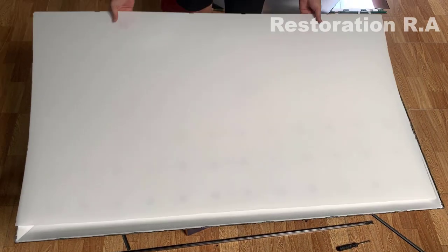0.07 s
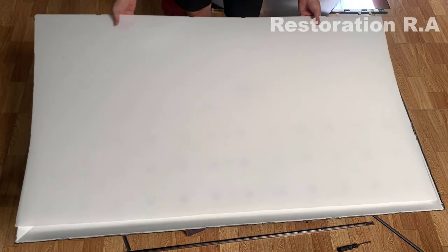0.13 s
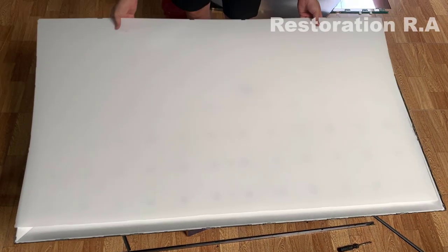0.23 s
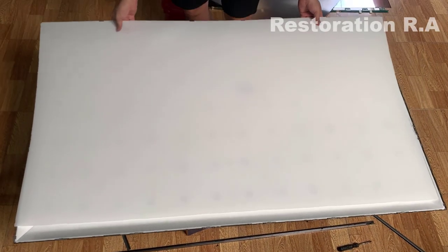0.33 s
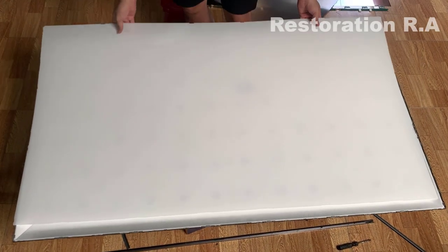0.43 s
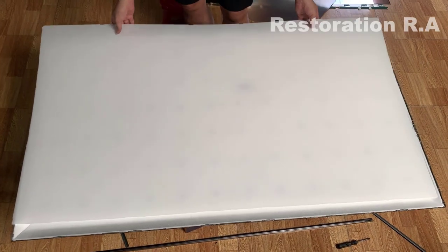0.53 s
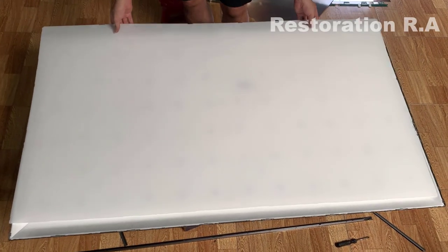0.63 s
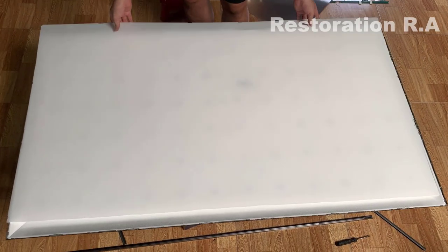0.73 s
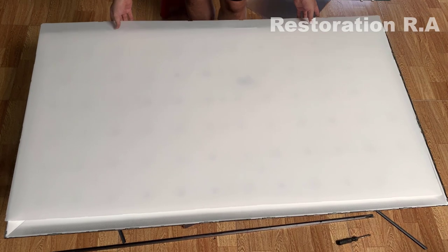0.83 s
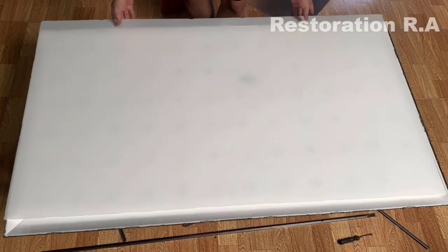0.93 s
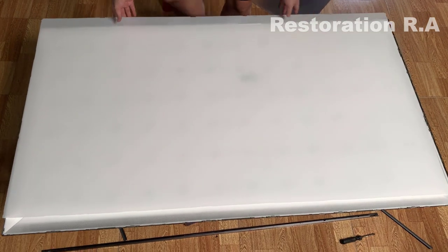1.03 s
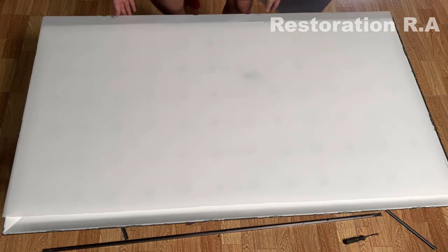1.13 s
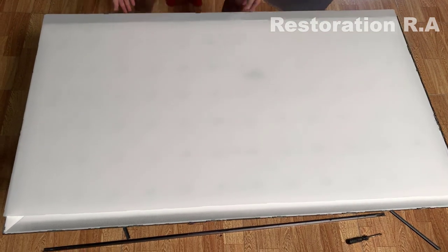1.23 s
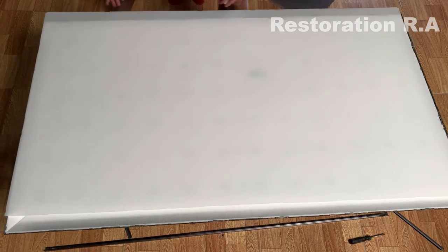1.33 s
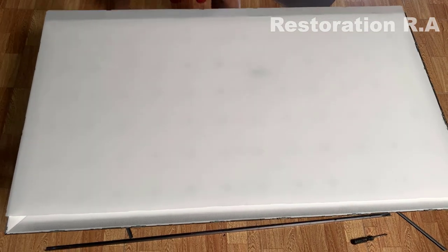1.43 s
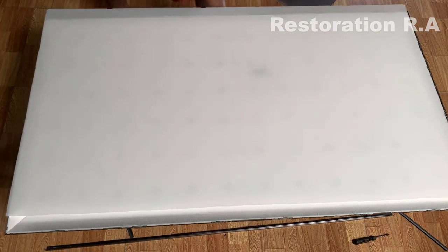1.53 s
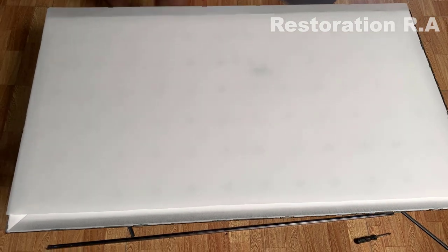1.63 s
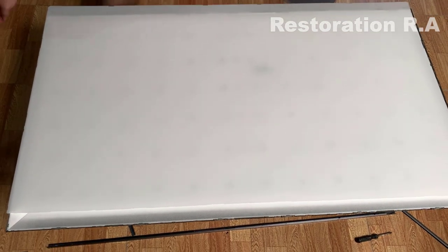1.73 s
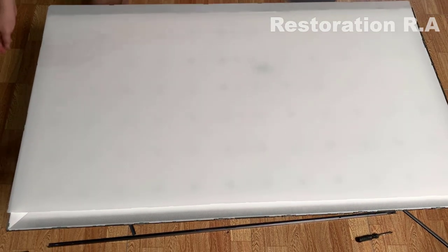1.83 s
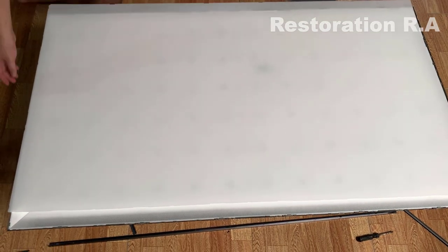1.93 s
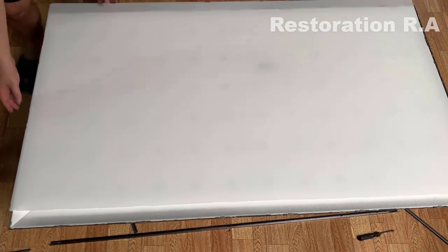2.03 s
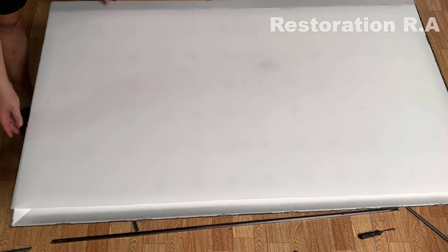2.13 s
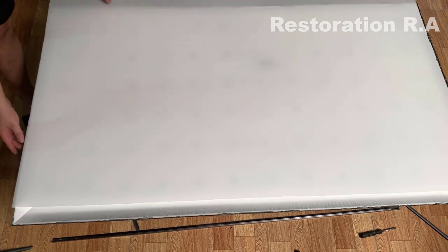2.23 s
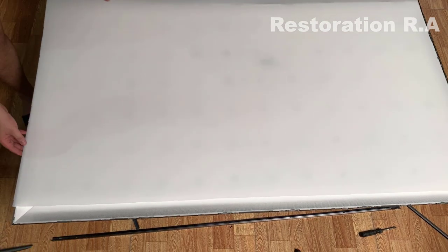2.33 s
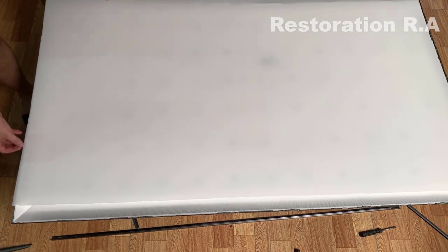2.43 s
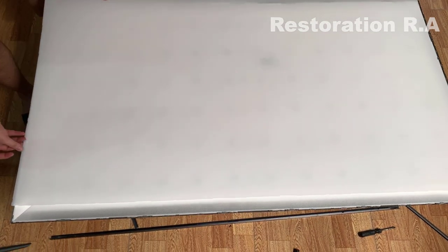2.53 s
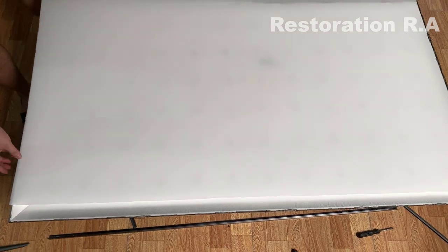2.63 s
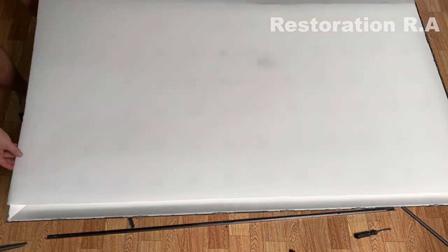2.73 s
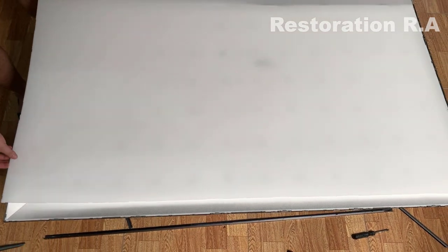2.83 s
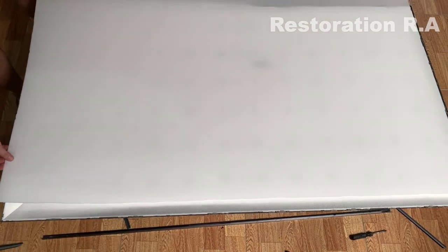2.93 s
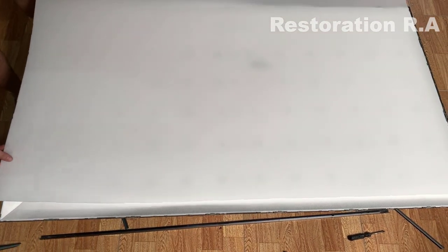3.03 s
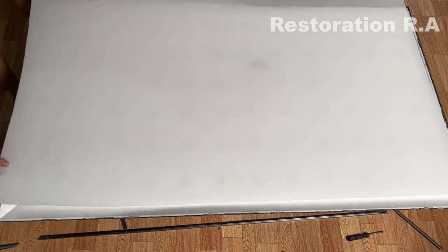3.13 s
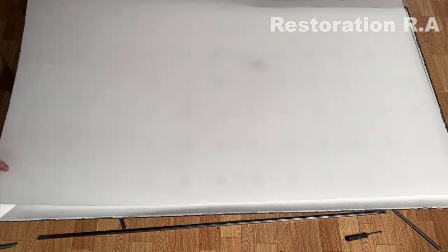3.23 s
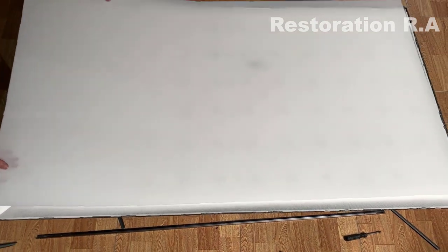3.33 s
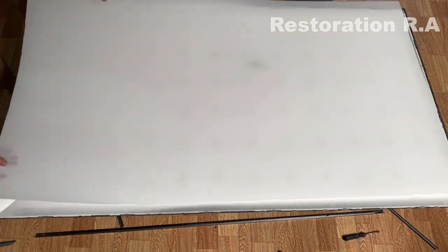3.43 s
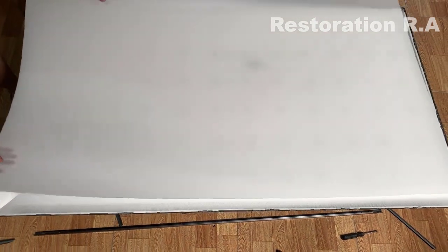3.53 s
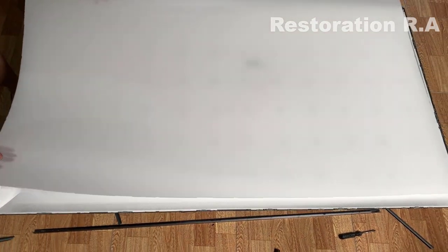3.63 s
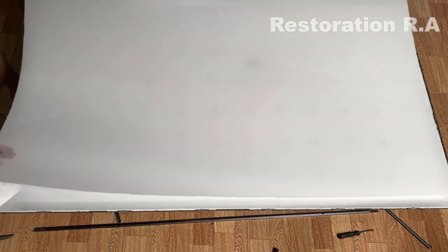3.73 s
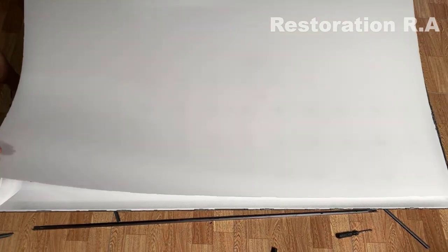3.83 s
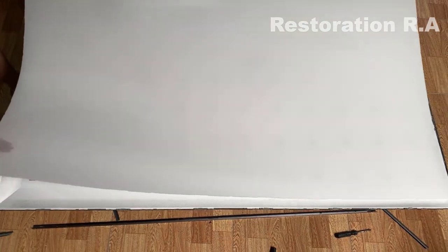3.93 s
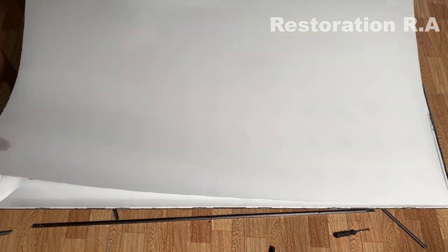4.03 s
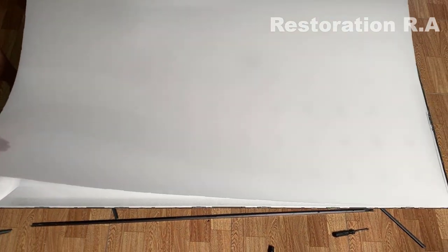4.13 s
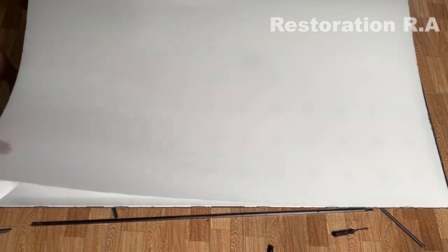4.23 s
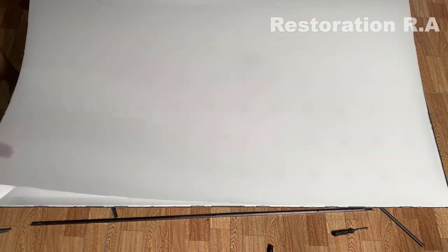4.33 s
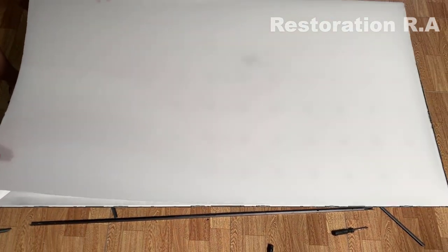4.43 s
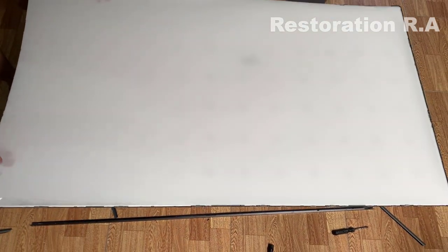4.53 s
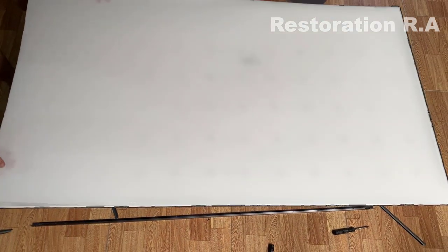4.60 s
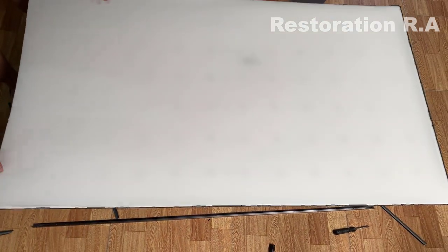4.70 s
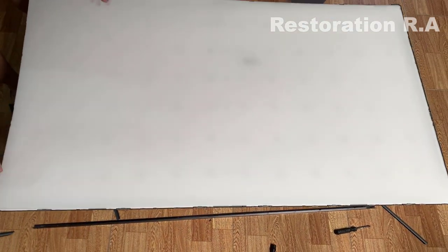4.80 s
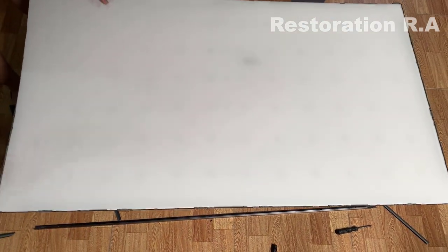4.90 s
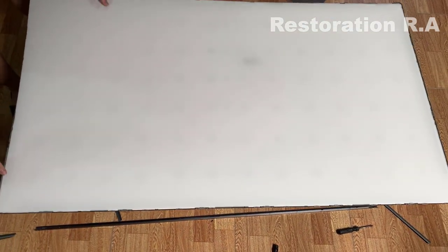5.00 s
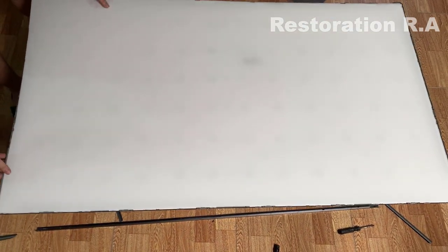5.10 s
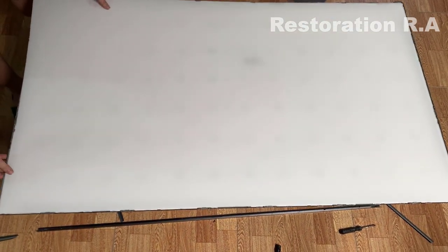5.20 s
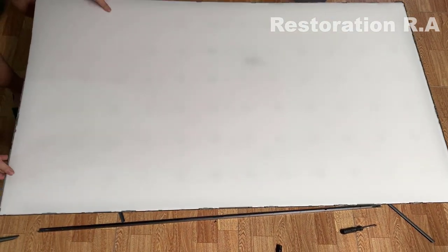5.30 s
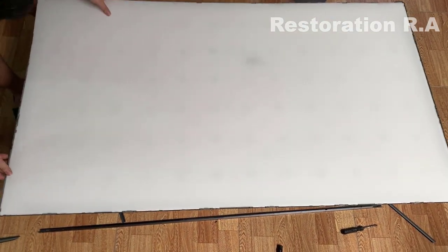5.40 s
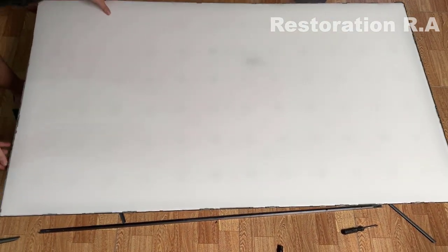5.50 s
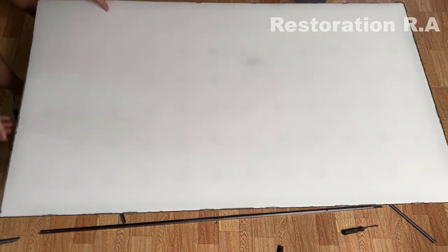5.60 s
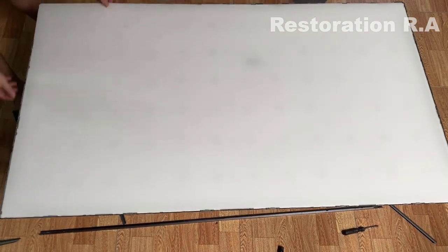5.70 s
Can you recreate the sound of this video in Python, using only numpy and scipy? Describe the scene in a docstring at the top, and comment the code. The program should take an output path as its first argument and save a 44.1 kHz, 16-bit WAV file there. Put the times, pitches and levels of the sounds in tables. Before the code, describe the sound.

A large, thin, stiff plastic sheet is moved by hand in a small room with short reflections, over a quiet low hum, faint hiss and a barely audible thin steady tone. From 0 to 0.45 s it is already moving: a rattling front, hollow mid-low knocks, gritty crackle and short high squeals of its edge. Softer bends follow, with a distinct hollow knock at about 0.9 s and a smaller one at 1.1 s. From 1.2 to 2.2 s it is nearly still, with only faint soft shuffling steps. Light knocks and a brief squeak come at 2.4 to 2.7 s. From 2.95 to 4.3 s the loudest passage erupts: dense sharp snaps, crackling, squealing and grating rubs, and low wobbling flaps, strongest around 4.0 to 4.2 s with a deep air puff. A separate knock lands at 4.55 s, a dull bend at 4.9 s, then only faint bends and small ticks to the end near 5.8 s.

```python
"""Low hollow knocks, crackle and squealing scrapes burst from a large thin plastic sheet, with pauses between.
It is lifted, bent and slid over its tray on a workshop floor: bends ring its dense low modes through fine slips,
its edge squeals and grates, flaps move filtered air noise, and creases snap as sharp ringing bursts.
Soft steps are filtered noise; a small room answers sheet and steps over a quiet hum with a thin steady tone."""
import sys
import numpy as np
from scipy import signal
from scipy.fft import rfft, irfft, next_fast_len
from scipy.io import wavfile
from scipy.ndimage import uniform_filter1d

SR = 44100
rng = np.random.default_rng(int(sys.argv[2]) if len(sys.argv) > 2 else 0)


def wav_record(signal):
    """Record a signal, one row per channel, as 16-bit PCM in the file named by sys.argv[1]."""
    frames = np.transpose(np.atleast_2d(signal))
    bounded = np.clip(frames, -1, 1)
    # unit amplitude maps onto the largest positive 16-bit level
    quanta = np.round(bounded * 32767).astype(np.int16)
    wavfile.write(sys.argv[1], SR, quanta)


N = 253871  # length in samples

# Resonances of the bending sheet, its stiff crackle and its rattling edge.
# Each row: frequency in Hz, width in Hz, relative level in dB.
BEND_MODES = [(417.3, 102, -17.5), (459.2, 57, 8.5), (482.6, 14, 19.5), (588.46, 94, 15), (684, 12, 3),
              (670, 4.9, 19), (785, 121, 11.5), (875, 8, 16.5), (888, 52, 11), (1006, 12, 2.5)]
CRACKLE_MODES = [(1120, 130, -2), (1238.5, 7.3, 3), (1270, 130, 0.5), (1570, 400, -5)]
RATTLE_MODES = [(1750, 430, 7.5), (2135, 530, 6.5), (2400, 280, 7.5), (4300, 2000, -12)]
# The edge rubs along the tray. Each row: start in seconds, rise in seconds, hold in seconds, squeal level in dB,
# then sheen and grit in dB against that level.
RUBS = [(0.0, 0.00081, 0.047, -38, -6, 9.5), (0.06, 0.026, 0.12, -38.5, -3, -6.5),
        (0.2, 0.013, 0.029, -31.5, -27, -37), (0.301, 0.0016, 0.01, -37.5, -31, -14),
        (0.35, 0.046, 0.023, -65.5, 10.5, 0), (0.899, 0.014, 0.13, -82, 5, 5),
        (2.385, .015, 0.015, -88, -14, 19), (2.432, 0.0038, 0.026, -57, -23, -21),
        (2.569, 0.032, 0.031, -41, -3, -13.5), (2.695, 0.022, 0.053, -69, 0, -15),
        (2.86, 0.04, 0.057, -65.5, 0, 9), (2.95, 0.0014, 0.076, -39.5, 1, -8),
        (2.998, 0.016, 0.0092, -27, -13.5, -8.5), (3.138, 0.009, 0.11, -33.5, -1, 5),
        (3.345, 0.0036, 0.067, -41, 2, 1), (3.398, 0.0087, 0.044, -39, -2.5, -5),
        (3.536, 0.004, 0.082, -35, -2.5, -2.5), (3.612, 0.031, 0.023, -30, 0, 0),
        (3.792, 0.0048, 0.034, -41.5, -5, -7.5), (3.871, 0.0034, 0.14, -40.5, -4, 2.5),
        (3.952, 0.022, 0.051, -34.5, 2.5, 4), (4.018, 0.032, 0.053, -29, 3, 6),
        (4.12, 0.031, 0.15, -31.5, -2, 2), (4.285, 0.024, 0.077, -39.5, 5.5, 9.5),
        (4.402, 0.012, 0.042, -42.5, 0.5, -5), (4.548, 0.0037, 0.017, -61.5, 10.5, 8.5),
        (4.64, 0.014, 0.012, -73.5, 14.5, 10), (4.918, 0.05, 0.021, -67.5, -14, 8),
        (5.317, 0.0027, 0.014, -64.5, 7, 6), (5.46, 0.012, 0.036, -77.5, -0.5, 13),
        (5.59, 0.04, 0.012, -51, -7, -19), (5.635, 0.0022, 0.0043, -48.5, -3.5, -23)]
WAVER_DB, WAVER_S = 3.5, .03  # random swell of each mode as the sheet changes shape, and its time step
DRIFT, DRIFT_S = .03, .06  # rough share by which bending shifts pitch, and seconds between shapes


def undb(db):
    """Turn dB into an amplitude factor."""
    return 10 ** (np.asarray(db) / 20)


def unit(x):
    """Scale to an RMS of one."""
    return x / np.sqrt(np.mean(x ** 2))


def decay(t60, count):
    """Exponential fade that loses 60 dB in t60 seconds."""
    return np.exp(-np.log(1000) * np.arange(count) / (SR * t60))


def pair(count):
    """Left and right noises whose likeness and phase offset depend on frequency."""
    # Stereo width. Each row: frequency in Hz, left-right coherence from 0 to 1,
    # phase lead of the left in radians (negative: the right leads).
    likeness = [(59.9, .9, 0), (487.6, 0.87, 0), (930, 0.65, 0), (2220, .4, -1.5), (4000, 0.6, -1.62),
                (7300, 0.9, -1.5), (10800, 0.1, -3), (15000, 1, -5)]
    hz, share, lead = np.transpose(likeness)
    pitch = np.log(np.fft.rfftfreq(count, 1 / SR) + 1)
    coherence = np.clip(np.interp(pitch, np.log(hz), share), 0, 1)
    lead = np.interp(pitch, np.log(hz), lead)
    left, other = rfft(rng.standard_normal((2, count)))
    right = coherence * left + np.sqrt(1 - coherence ** 2) * other
    return irfft([left, right * np.exp(-1j * lead)], count)


def ring(x, modes, waver_db=0):
    """Resonances with neighbours in opposite sign; little is radiated outside the family."""
    bottom = modes[0][0] - 2 * modes[0][1]
    top = min(modes[-1][0] + 2 * modes[-1][1], .45 * SR)
    band = signal.butter(2, np.maximum([bottom, top], 20), "band", fs=SR, output="sos")
    x = signal.sosfilt(band, x)
    out, t = 0, np.arange(x.shape[1]) / SR
    for k, (hz, width, db) in enumerate(modes):
        if waver_db:
            knots = np.arange(0, t[-1] + WAVER_S, WAVER_S)
            db = db + waver_db * np.interp(t, knots, rng.standard_normal(len(knots)))
        mode = signal.lfilter(*signal.iirpeak(hz, hz / width, SR), x)
        out = out + (-1) ** k * undb(db) * mode
    return out


def split(modes, hz):
    """The modes below a frequency, then those from it upwards."""
    return [m for m in modes if m[0] < hz], [m for m in modes if m[0] >= hz]


def slips(rate, scatter_db, t60, click_db):
    """Random slips per second of uneven size: a click, then a short rustle as the bend spreads."""
    size_db = scatter_db * np.minimum(rng.exponential(size=N), 3)
    hit = (rng.random(N) < rate / SR) * undb(size_db)
    # rustles add as powers
    rustle = np.sqrt(signal.fftconvolve(hit ** 2, decay(t60, 3300) ** 2)[:N] + 1e-12)
    return (rustle + undb(click_db) * hit) * pair(next_fast_len(N))[:, :N]


def swells(rows, levels_db, fall):
    """Each row climbs to its level, holds, then dies away at fall dB per s; rows add as powers."""
    rise_db = 25  # climbed during the rise
    t, power = np.arange(0, N + 64, 32) / SR, 1e-14
    for (start, rise, hold, *_), db in zip(rows, levels_db):
        top = start + max(rise, .001)
        climb_left_db = rise_db * np.maximum(top - t, 0) / (top - start)
        fallen_db = fall * np.maximum(t - top - hold, 0)
        power = power + undb(db - climb_left_db - fallen_db) ** 2
    return np.interp(np.arange(N) / SR, t, np.sqrt(power))


def balance(rows):
    """Gain that follows a table of time in seconds and level in dB."""
    return undb(np.interp(np.arange(N) / SR, *np.transpose(rows)))


def drift(x, share):
    """The modes slide up and down together as the curvature changes, by a wandering delay."""
    at, knots = np.arange(N), np.arange(0, N + DRIFT_S * SR, DRIFT_S * SR)
    lag = share * DRIFT_S * SR * rng.standard_normal(len(knots))
    lag = uniform_filter1d(np.interp(at, knots, lag), int(DRIFT_S * SR / 2))
    return np.array([np.interp(at + lag, at, side) for side in x])


def bending(scrape):
    """Fine slips in the flexing plastic drive low modes, crackle and edge rattle; rubbing adds to the rattle."""
    # The sheet is bent. Each row: start in seconds, rise in seconds, hold in seconds, level in dB,
    # stiff crackle in dB against that level.
    bends = [(0.0, 0.00056, 0.045, -31.5, -4.5), (0.067, 0.044, 0.061, -30.5, -7.5),
             (0.291, 0.0016, 0.018, -53, 8), (0.36, 0.042, 0.019, -37, -16),
             (0.558, 0.04, 0.066, -47, -21.5), (0.634, 0.069, 0.082, -42.5, -21),
             (0.885, 0.039, 0.017, -31, -11), (0.954, 0.025, 0.08, -40.5, -15.5),
             (1.1, 0.029, 0.027, -42.5, -13), (2.174, 0.037, .03, -52, -20),
             (2.303, 0.016, 0.032, -57.5, -28.5), (2.47, 0.027, 0.04, -39.5, -12),
             (2.53, 0.013, 0.062, -52, -4.5), (2.73, 0.058, 0.056, -61.5, -13),
             (2.838, 0.099, .02, -54.5, -5.5), (2.937, 0.022, 0.043, -36.5, -4),
             (2.996, 0.0088, 0.034, -34.5, -8), (3.129, 0.012, 0.095, -30.5, -4),
             (3.275, 0.018, 0.041, -37, -15), (3.324, 0.0069, .04, -36, -8.5),
             (3.406, 0.0078, 0.092, -30.5, -8.5), (3.556, 0.0049, 0.035, -29, -5),
             (3.623, 0.018, 0.028, -39.5, -5), (3.795, 0.021, .05, -54, -1.5),
             (3.866, 0.0087, .04, -38.5, -5), (3.953, 0.025, 0.06, -31.5, -4),
             (4.007, 0.075, 0.062, -26, -6.5), (4.084, 0.031, .1, -27, -5), (4.237, 0.025, .1, -33, -1),
             (4.564, 0.00086, 0.0084, -41.5, -5), (4.566, 0.023, 0.048, -51, -14.5),
             (4.759, 0.045, 0.022, -46.5, -20), (4.852, 0.066, 0.044, -37.5, -11),
             (5.01, 0.016, 0.01, -52, -22.5), (5.263, 0.044, 0.038, -56.5, -32.5),
             (5.385, 0.023, 0.042, -50.5, -16.5), (5.448, 0.03, 0.055, -54, -12.5),
             (5.576, 0.03, 0.11, -55, -10.5)]
    # Balance of the deep modes against the higher ones. Each row: time in seconds, level in dB.
    deep_balance = [(0, -2.5), (0.499, -9), (.9, 1), (1.302, -9), (2.2, -2), (2.6, 8.5), (3, -2), (3.4, 1),
                    (3.798, -4.5), (4.2, -2), (4.602, 4.5), (4.9, 9.5), (5.3, 7.5), (5.76, 17)]
    deep_hz = 590  # deep modes lie under this
    bend_fall, crackle_fall, rattle_fall = 177, 300, 250  # dB per s after the hold
    bent_db, rubbed_db = -6, -8  # edge rattle against crackle and against rubbing
    flexing = slips(rate=350, scatter_db=2.5, t60=0.055, click_db=14.0)
    bend_db, stiff_db = np.transpose(bends)[3:]
    bend = swells(bends, bend_db, bend_fall)
    crackle = swells(bends, bend_db + stiff_db, crackle_fall)
    bent_rattle = swells(bends, bend_db + stiff_db + bent_db, rattle_fall)
    rattle = np.hypot(bent_rattle, undb(rubbed_db) * scrape)
    low, high = (drift(ring(flexing, modes, WAVER_DB), DRIFT) for modes in split(BEND_MODES, deep_hz))
    body = bend * (balance(deep_balance) * low + high) / np.std(low + high)
    for gain, modes in [(crackle, CRACKLE_MODES), (rattle, RATTLE_MODES)]:
        body = body + gain * unit(drift(ring(flexing, modes, WAVER_DB), DRIFT))
    return body


def rubbing(scrape):
    """Slips along the edge excite a squeal, a higher sheen and broad grit, with its own level in each rub."""
    # Resonances of the squeal, sheen and grit, then the broad resonance round squeal and sheen.
    # Each row: frequency in Hz, width in Hz, relative level in dB.
    squeal_modes = [(3600, 160, -7), (3765, 120, 0), (3900, 130, -4), (4300, 500, -16)]
    sheen_modes = [(9900, 900, -22), (10800, 450, -7), (12400, 1600, -24)]
    grit_modes = [(3460, 500, 5), (4500, 900, 3), (5930, 1100, -4), (9260, 3500, -4.5), (11430, 860, 7.5),
                  (12310, 1200, 6.5), (15900, 1300, 6)]
    squeal_focus = [(3780, 900, 0)]
    sheen_focus = [(10800, 1100, 0)]
    # Balance of the fine grit against the lower grit. Each row: time in seconds, level in dB.
    fine_balance = [(0, -2), (.2, 5.5), (.9, -7.5), (2.6, -11), (3, 2.5), (3.5, 1.5), (4.4, 1),
                    (4.579, 17.5), (4.95, -8.5), (5.33, 4), (5.5, -10), (5.7, -12)]
    fine_hz = 12000  # fine grit lies above this
    sheen_fall, grit_fall = 210, 440  # dB per s after the hold
    squeal_waver_db, squeal_drift = 3, .008  # the squeal breaks up and wanders a little
    grit_waver_db = 1.5
    slipping = slips(rate=800, scatter_db=2.0, t60=0.045, click_db=4.0)
    rub_db, sheen_db, grit_db = np.transpose(RUBS)[3:]
    sheen_level = swells(RUBS, rub_db + sheen_db, sheen_fall)
    grit_level = swells(RUBS, rub_db + grit_db, grit_fall)
    squeal = ring(ring(slipping, squeal_focus), squeal_modes, squeal_waver_db)
    squeal = drift(squeal, squeal_drift)
    sheen = ring(ring(slipping, sheen_focus), sheen_modes, WAVER_DB)
    coarse, fine = (ring(slipping, modes, grit_waver_db) for modes in split(grit_modes, fine_hz))
    grit = (coarse + balance(fine_balance) * fine) / np.std(coarse + fine)
    return scrape * unit(squeal) + sheen_level * unit(sheen) + grit_level * grit


def flapping():
    """The whole sheet flaps: air noise excites its wobble and a deep puff pushed out from under it."""
    # Flaps. Each row: start in seconds, rise in seconds, hold in seconds, wobble in dB, air puff in dB.
    flaps = [(0.0, 0.00081, 0.0018, -26.5, -50), (0.096, 0.049, 0.14, -50.5, -54),
             (0.525, 0.081, 0.42, -53.5, -61.5), (0.867, 0.057, 0.033, -41, -67),
             (1.038, 0.031, 0.097, -51, -64), (2.493, 0.035, 0.16, -76, -77),
             (2.946, 0.034, 0.038, -60, -56.5), (3.066, 0.034, 0.17, -49.5, -63.5),
             (3.362, 0.064, 0.051, -36, -51), (3.55, 0.044, 0.0047, -42, -55),
             (3.935, 0.026, 0.006, -48, -64), (4.064, 0.052, 0.029, -38, -40.5),
             (4.194, 0.024, 0.061, -45, -69.5), (4.582, 0.049, 0.035, -61.5, -62.5),
             (4.896, 0.059, 0.024, -42, -59)]
    # Resonances of wobble and puff. Each row: frequency in Hz, width in Hz, relative level in dB.
    wobble_modes = [(162, 73, 1), (261, 14, 8), (294, 230, 0)]
    puff_modes = [(54, 20, -13), (64.3, 13, 0), (95, 36, -16)]
    wobble_fall, puff_fall = 334, 190  # dB per s after the hold
    air = pair(next_fast_len(N))[:, :N]
    wobble_db, puff_db = np.transpose(flaps)[3:]
    wobble = swells(flaps, wobble_db, wobble_fall) * unit(ring(air, wobble_modes, WAVER_DB))
    puff = swells(flaps, puff_db, puff_fall) * unit(ring(air, puff_modes, WAVER_DB))
    return wobble + puff


def hum():
    """The workshop at rest: low rumble, faint hiss and one thin steady tone."""
    # Noise spectrum. Each row: frequency in Hz, relative density in dB per Hz.
    spectrum = [(18, -46), (30, -7), (70, 0), (295, -2.5), (461, -16.5), (822, -13), (889, -18),
                (1720, -22.5), (6050, -31), (9970, -28), (12600, -36.5), (13700, -45.5), (16000, -64.5)]
    noise_db, tone_db, tone_hz = -63, -83.5, 897  # RMS levels ahead of the left-right trim
    count, (hz, db) = next_fast_len(N), np.transpose(spectrum)
    gain = undb(np.interp(np.log(np.fft.rfftfreq(count, 1 / SR) + 1), np.log(hz), db))
    noise = irfft(rfft(pair(count)) * gain, count)[:, :N]
    tone = np.sqrt(2) * undb(tone_db) * np.sin(2 * np.pi * tone_hz * np.arange(N) / SR)
    return undb(noise_db) * unit(noise) + tone


def snaps():
    """Each crease lets go at once: a sharp front, then the sheet rings out, crack and tick driven shortest."""
    # Snapping creases. Each row: start in seconds, then knock, crack, rattle and tick in dB.
    creases = [(0.014, -33.5, -38, -26, -48), (0.045, -43.5, -42, -45.5, -48.5), (0.12, -33, -64, -67, -50),
               (0.165, -39, -54, -36, -40), (0.216, -39, -37.5, -60.5, -56), (0.302, -44, -48, -29, -49),
               (0.397, -65, -45, -72, -44), (0.414, -50, -56.5, -69, -55), (0.529, -51, -60, -71, -66),
               (0.625, -60, -63, -84, -83), (0.925, -31, -34, -66, -64), (1.134, -36, -52, -74, -74),
               (2.222, -42, -78, -74, -85.5), (2.32, -51.5, -76, -83.5, -93), (2.439, -50, -61, -89, -61),
               (2.489, -44, -52, -70, -80), (2.501, -37, -42, -72, -65), (2.589, -41.5, -50, -67, -43),
               (2.616, -49.5, -54.5, -56.5, -44), (2.647, -47.5, -54, -59, -61),
               (2.95, -32, -30, -43.5, -35.5), (2.984, -40, -41, -37, -31.5),
               (3.004, -26.5, -22.5, -34.5, -28.5), (3.015, -21.5, -24, -30.5, -44.5),
               (3.143, -26.5, -35, -69, -32), (3.209, -25.5, -26, -33, -23.5), (3.23, -26, -26, -23, -45),
               (3.347, -29.5, -28.5, -60, -42), (3.375, -38, -40, -35.5, -32.5),
               (3.413, -27.5, -30, -31.5, -52), (3.542, -52, -40, -42, -50), (3.555, -27, -23, -48, -29.5),
               (3.644, -28.5, -33, -43.5, -34.5), (3.795, -50, -53, -66.5, -43.5),
               (3.875, -37, -28.5, -26.5, -27), (3.924, -32, -44.5, -32.5, -33),
               (3.944, -26, -25, -33.5, -45), (3.972, -24, -24.5, -38, -44), (3.984, -28, -39, -39.5, -47),
               (3.993, -31, -31.5, -30.5, -33.5), (4.048, -28.5, -33, -42.5, -33),
               (4.075, -31.5, -29, -34.5, -39), (4.109, -24, -25, -29.5, -35),
               (4.121, -19, -44, -28.5, -24.5), (4.138, -29.5, -20.5, -41.5, -27.5),
               (4.186, -22, -33, -30.5, -44), (4.215, -34.5, -42, -27, -29), (4.41, -31, -45, -36.5, -46),
               (4.554, -25.5, -32, -49, -55), (4.659, -50, -61, -68, -71), (5.324, -68, -81.5, -82, -52),
               (5.415, -42.5, -86, -87, -75), (5.639, -45, -70, -64.5, -41.5),
               (5.708, -42.5, -79, -80, -79)]
    # Resonances of the tick. Each row: frequency in Hz, width in Hz, relative level in dB.
    tick_modes = [(3725, 170, 6.5), (4167, 900, -6), (7000, 1900, -18.5), (10570, 860, -4.5),
                  (12900, 2200, -15), (16000, 2700, -16)]
    count, t60 = 4096, 0.16  # burst in samples, longest drive decay in seconds
    # modes, share of the decay time, gain of the front
    parts = [(BEND_MODES, 1., 8), (CRACKLE_MODES, .9, 8), (RATTLE_MODES[:-1], 1., 8), (tick_modes, .8, 4)]
    out = np.zeros((2, N + count))
    for start, *levels_db in creases:
        burst, at = pair(count), int(start * SR)
        front = burst * decay(.004, count)
        for db, (modes, shorter, sharp) in zip(levels_db, parts):
            part = ring(sharp * front + burst * decay(shorter * t60, count), modes)
            onset = np.sqrt(np.mean(part[:, :256] ** 2))  # the level is set by the first 256 samples
            out[:, at:at + count] += undb(db) * part / onset
    return out[:, :N]


def feet():
    """Soft soles drag over the boards: one noise rings a low sole thud and a high dusty rustle."""
    # Steps round the sheet. Each row: start in seconds, rise in seconds, hold in seconds, sole in dB, dust in dB.
    steps = [(1.18, 0.019, 0.028, -80, -68), (1.299, 0.022, 0.022, -57.5, -89),
             (1.483, 0.077, 0.032, -60.5, -77.5), (1.753, 0.046, 0.052, -62.5, -69),
             (2.14, 0.048, 0.012, -66, -99)]
    # Resonances of sole and dust. Each row: frequency in Hz, width in Hz, relative level in dB.
    sole_modes = [(252, 79, -4.5), (577, 120, -11)]
    dust_modes = [(2510, 980, 5), (8040, 12000, -8)]
    step_fall = 200  # dB per s after the hold
    sole_db, dust_db = np.transpose(steps)[3:]
    drag = pair(next_fast_len(N))[:, :N]
    sole = swells(steps, sole_db, step_fall) * unit(ring(drag, sole_modes))
    dust = swells(steps, dust_db, step_fall) * unit(ring(drag, dust_modes))
    return sole + dust


def small_room(sound):
    """Walls answer the mono sum with decaying noise and return less treble."""
    t60, level_db, treble_hz, count = 0.35, -9, 5300, 16384  # seconds, dB, low-pass Hz, samples
    walls = signal.lfilter(*signal.butter(1, treble_hz, fs=SR), pair(count)) * decay(t60, count)
    walls = walls / np.sqrt(np.sum(walls ** 2) / 2)
    mono = sound.mean(axis=0, keepdims=True)
    return undb(level_db) * signal.fftconvolve(mono, walls, axes=1)[:, :N]


def scene():
    """Sheet and steps with their room, over the hum, trimmed left to right."""
    left_db = -0.39  # the right gets the opposite
    scrape = swells(RUBS, np.transpose(RUBS)[3], 470)  # falls 470 dB per s after the hold
    near = bending(scrape) + rubbing(scrape) + flapping() + snaps() + feet()
    return (near + small_room(near) + hum()) * undb([[left_db], [-left_db]])


def record(dry):
    """The treble ends abruptly: a steep elliptic low-pass."""
    top_hz = 15700
    return signal.sosfilt(signal.ellip(12, .3, 70, top_hz, fs=SR, output="sos"), dry)


dry = scene()
out = record(dry)
wav_record(out)
```